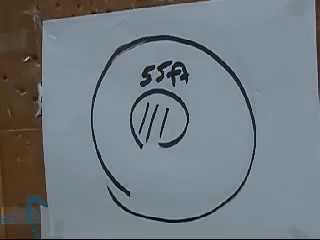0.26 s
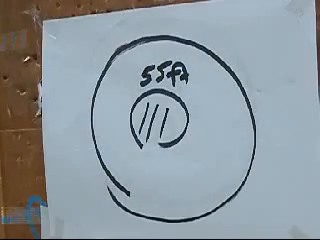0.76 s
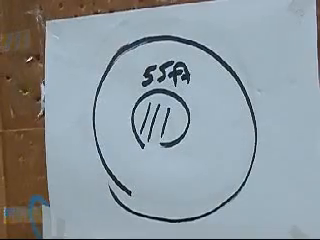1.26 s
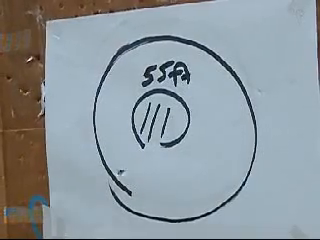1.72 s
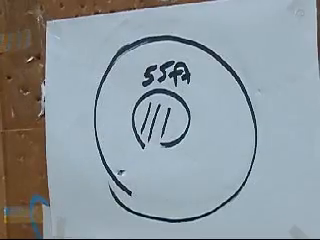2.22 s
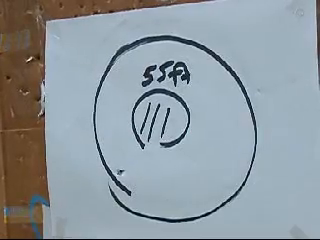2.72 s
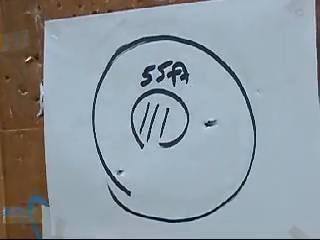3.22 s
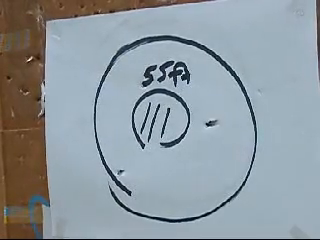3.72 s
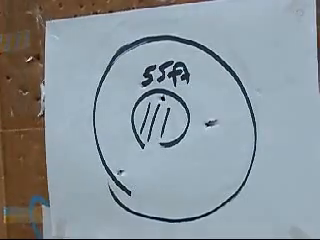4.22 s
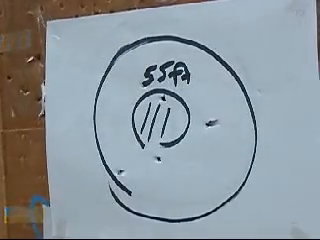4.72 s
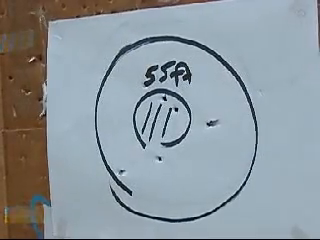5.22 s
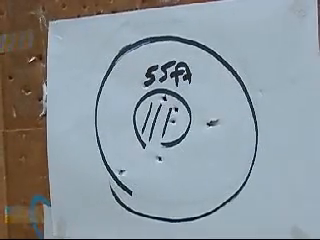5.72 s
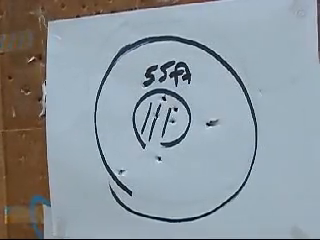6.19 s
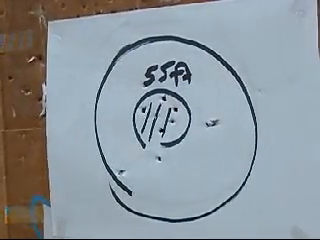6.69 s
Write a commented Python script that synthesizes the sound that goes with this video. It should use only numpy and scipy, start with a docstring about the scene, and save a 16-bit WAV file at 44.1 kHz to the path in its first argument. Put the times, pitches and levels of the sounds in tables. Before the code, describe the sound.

Distant airsoft rifle clacks in single shots, each followed by a sharp paper crack, cardboard thump and rattling pellets, over a swelling hum in an echoing hall.

```python
"""A faint hum and thin electronic tones fade in: coloured noise that slowly swells, and wavering sines.
Far off, an electric airsoft rifle fires single shots: gear whine, then a small double clack made of noise clicks.
About 95 ms after most shots, a BB cracks through a paper target near the microphone.
The cardboard box behind it thumps and crunches, from ringing modes and spiky noise; then BBs rattle inside.
Both places echo in a hall, and the loudest cracks overload the recorder."""
import sys
import numpy as np
from scipy import signal
from scipy.fft import rfft, irfft, next_fast_len
from scipy.io import wavfile
from scipy.ndimage import uniform_filter1d

SR = 44100
rng = np.random.default_rng(int(sys.argv[2]) if len(sys.argv) > 2 else 0)


def master_out(mix):
    """Clip the mix to full scale and print it as 16-bit PCM to the path in sys.argv[1]."""
    frames = np.transpose(np.atleast_2d(mix))
    ceiling = np.clip(frames, -1, 1)
    pcm = np.round(ceiling * 32767).astype(np.int16)
    wavfile.write(sys.argv[1], SR, pcm)


N = 306495  # samples, just under 7 s


def amp(db):
    """Turn decibels into a gain."""
    return 10 ** (np.asarray(db) / 20)


def unit(x):
    """Scale a sound to an rms of 1."""
    return x / np.sqrt(np.mean(x ** 2) + 1e-20)


def along(points, hz):
    """Read a curve of (frequency [Hz], value) points on a log frequency axis."""
    point_hz, values = np.transpose(points)
    return np.interp(np.log(hz + 1), np.log(point_hz + 1), values)


def clock():
    """Time in seconds over the half second that one event may last."""
    return np.arange(SR // 2) / SR


def dying(t, t60):
    """Silent before t = 0, then fading by 60 dB in t60 seconds."""
    return (t >= 0) * np.exp(-np.log(1000) * np.abs(t) / t60)


def noise(spectrum, size):
    """Random hiss of rms 1, coloured by (frequency [Hz], level [dB]) points."""
    hz = np.fft.rfftfreq(size, 1 / SR)
    white = rng.standard_normal(size)
    return unit(irfft(rfft(white) * amp(along(spectrum, hz)), size))


def leveled(x, seconds):
    """Scale a sound to rms 1 over its first seconds."""
    start = x[:max(8, int(seconds * SR))]
    return x / np.sqrt(np.mean(start ** 2) + 1e-20)


def add(track, s, sound):
    """Mix a sound into the track from time s [s]."""
    part = track[max(0, round(s * SR)):][:len(sound)]
    part += sound[:len(part)]


def lowpass(x, hz, order):
    """Cut steeply above hz."""
    size = next_fast_len(N + 8192)
    bins_hz = np.fft.rfftfreq(size, 1 / SR)
    return irfft(rfft(x, size) / np.sqrt(1 + (bins_hz / hz) ** (2 * order)), size)[:N]


def crumple(spectrum, t60, spiky_db):
    """Noise that dies away in uneven little snaps."""
    t = clock()
    wander = unit(uniform_filter1d(rng.standard_normal(len(t)), size=90))
    return amp(spiky_db * wander) * noise(spectrum, len(t)) * dying(t, t60)


# how long the hall rings: (frequency [Hz], time to fall 60 dB [s])
HALL_DECAY = [(100, 0.13), (700, 0.32), (2000, 0.75), (5000, 0.87), (8000, 0.7)]


def room(x, gap, build, echoes):
    """A long hall: a diffuse tail and smeared wall echoes, with fine detail that changes from moment to moment."""
    out, hop = np.zeros(N), SR // 3
    padded = np.pad(x, (hop, 2 * hop))
    for start in range(0, N + hop, hop):
        # shape fresh noise into this moment's answer of the hall
        hz, t, z = signal.stft(rng.standard_normal(SR // 2), SR, nperseg=256)
        rise = 1 - np.exp(-np.maximum(t - gap, 0) / build)
        diffuse = rise * dying(t, along(HALL_DECAY, hz)[:, None])
        slaps = sum(amp(db) * dying(t - s, 0.045) for s, db in echoes)
        # the walls return little bass
        slaps = slaps * amp(along([(300, -18), (1500, 6.5), (7000, -2.5)], hz))[:, None]
        tail = signal.istft(z * np.hypot(diffuse, slaps), SR, nperseg=256)[1]
        # reflections come in clumps
        clumps = unit(uniform_filter1d(rng.standard_normal(len(tail)), size=260))
        tail = tail * amp(4.6 * clumps)
        # overlapping pieces blend one answer into the next
        piece = padded[start:start + 2 * hop] * np.hanning(2 * hop)
        wet = signal.fftconvolve(piece, tail / np.linalg.norm(tail))
        add(out, (start - hop) / SR, wet[max(0, hop - start):])
    return out


# ringing modes of the cardboard box, before each strike varies them:
# (frequency [Hz], level [dB], time to fall 60 dB [s])
BOX_MODES = [(133.4, -21, 0.2), (244.6, -14, 0.14), (317, -3, 0.033), (399.5, -10.5, 0.15),
             (484.4, -1, 0.051), (559.2, -0.5, 0.091), (599.5, -5, 0.063), (715.4, -1.5, 0.05),
             (768, 0, 0.052), (856, -8, 0.094), (987, -4, 0.068), (1195, -19.5, 0.12), (1552, -17, 0.15),
             (1834, -20, 0.16)]


def box(panel_hz, focus_db, reach_db, life):
    """The box rings at new strengths, most of all in the modes near the pitch of the struck panel."""
    t = clock()[:SR // 4]
    hz, db, t60 = np.transpose(BOX_MODES)[:, :, None]
    size, detune, phase = rng.standard_normal((3, len(BOX_MODES), 1))
    # modes far from the panel's pitch are weaker, by reach_db at most
    weight_db = 3 * size - np.minimum(focus_db * np.log2(hz / panel_hz) ** 2, reach_db)
    modes = np.sin(2 * np.pi * hz * (1 + .03 * detune) * t + 2 * phase)
    ring = np.sum(amp(db + weight_db) * dying(t, t60 * life) * modes, axis=0)
    return ring * (1 - np.exp(-t / 0.00099))  # soft start


# colour of the hum and hiss: (frequency [Hz], relative level [dB])
HUM_COLOUR = [(20, 0.5), (120, -0.5), (200, -11), (290, -10.5), (380, -11), (800, -9), (1300, -19.5),
              (1900, -18.5), (2300, -26.5), (6900, -26.5), (7300, -14), (7600, -31)]
# thin steady tones: (frequency [Hz], rms level [dB])
WHINE_TONES = [(1950, -60.5), (7012, -49), (7290, -53), (7356, -58.5)]
# the hum's starting level, and its slow swell
BACKGROUND_DB, SWELL_DB_PER_S = -40, 0.636


def background():
    """Low room hum and hiss, with a few thin electronic tones that waver slightly."""
    t = np.arange(N) / SR
    whine = np.zeros(N)
    for hz, db in WHINE_TONES:
        drift = .004 * np.cumsum(rng.standard_normal(N))  # phase wanders at random
        whine += amp(db) * np.sqrt(2) * np.sin(2 * np.pi * hz * t + drift)
    hum = noise(HUM_COLOUR, next_fast_len(N))[:N]
    return amp(BACKGROUND_DB + SWELL_DB_PER_S * t) * hum + whine


# the piston slams home: (time [s], level [dB])
SHOTS = [(0.457, -12), (1.099, -16.5), (1.7202, -15.5), (2.8379, -16.5), (3.4295, -17), (3.9798, -16.5),
         (4.5198, -17.5), (5.109, -17), (5.692, -18.5), (6.0179, -18.5), (6.3307, -20), (6.611, -21),
         (6.9165, -19.5)]
# the clicks within one shot: (delay [s], level against the shot [dB])
SHOT_CLICKS = [(-.003, -7.5), (0, 4.5), (.0032, 9), (.0085, -4)]
# colour of the clicks and the rattle: (frequency [Hz], relative level [dB])
CLACK_COLOUR = [(60, -21), (200, -25), (700, 2.5), (1200, -3), (1850, -1), (2400, -8), (4000, 2), (5600, 3),
                (7500, -2.5)]


def rifle():
    """The gears whine as they cock the spring; then piston and gearbox clack 3 ms apart over a short puff of air."""
    out, t = np.zeros(N), clock()
    lead = .07  # s of gear whine before the shot
    u = t - lead  # time from the shot
    for s, db in SHOTS:
        for delay, click_db in SHOT_CLICKS:
            click = leveled(noise(CLACK_COLOUR, len(t)) * dying(t, 0.0038), 0.0009)
            add(out, s + delay, amp(db + click_db) * click)
        # the rattle grows towards the shot and dies more slowly after it
        swell = np.where(u < 0, dying(-u, .035), dying(u, .09))
        rattle = .42 * swell * noise(CLACK_COLOUR, len(t))
        air = noise([(60, -6.5), (200, -9.5), (750, -4.0), (1400, -12), (4000, -34.5)], len(t))
        puff = amp(-7.0) * dying(u + 0.0015, 0.095) * air
        winding = np.sin(np.pi * np.minimum(t / lead, 1))
        gears = noise([(1200, -28.5), (1550, -3.5), (1900, -26), (5000, -11.5), (5450, -9), (5900, -20.5)], len(t))
        add(out, s - lead, amp(db) * (rattle + puff + amp(-26) * winding * gears))
    return out


# a BB hits the target; also played by thumps() and cracks():
# (time [s], box thump level [dB], crunch level of torn board [dB], panel pitch [Hz])
HITS = [(1.187, -13, -20.5, 690), (1.81, -14.5, -19, 575), (2.9318, -15, -20, 670), (3.525, -22, -22, 616),
        (4.0695, -15, -22.5, 540), (4.6134, -16.5, -23, 613), (5.2044, -14.5, -24.5, 680),
        (5.7869, -12, -22, 820), (6.1133, -14, -22.5, 550), (6.4197, -16, -26, 610),
        (6.7068, -13, -34, 556)]
# colour of a small tick, also played by bounces(): (frequency [Hz], relative level [dB])
TICK_COLOUR = [(200, -27.5), (800, 7), (1800, -2.5), (3000, 1), (5000, -2.5), (7500, -8.5)]


def skitter():
    """Each hit stirs loose BBs and flakes of board into a few faint ticks."""
    out, t = np.zeros(N), clock()[:SR // 4]
    for s, *_ in HITS:
        for when, size in rng.random(size=(6, 2)):
            delay = 0.027 + .3 * when
            tick = leveled(noise(TICK_COLOUR, len(t)) * dying(t, 0.037), 0.023)
            knock = leveled(box(780, focus_db=9, reach_db=14.0, life=1.0), 0.011)
            level_db = -27.5 - 11.3 * size - 36.3 * delay  # later ticks tend to be softer
            add(out, s + delay, amp(level_db) * (tick + 0.69 * knock))
    return out


# spent BBs bounce inside the box: (time [s], knock level [dB], tick level [dB])
BOUNCES = [(1.259, -15.5, -46), (1.2893, -29, -34), (1.3264, -21, -34), (1.4415, -25, -43),
           (1.4554, -31.5, -33), (1.5981, -26.5, -35.5), (1.8475, -14.5, -26), (1.9073, -18.5, -24.5),
           (2.0155, -23.5, -36), (2.0488, -23, -31.5), (2.084, -27.5, -38.5), (2.2043, -30, -36),
           (2.2882, -33, -39.5), (3.0371, -32, -29), (3.1715, -42, -34), (3.5795, -23, -22),
           (3.6254, -12.5, -20.5), (3.879, -39, -31), (4.114, -16, -21), (4.2902, -27, -54),
           (4.381, -21.5, -51), (4.4735, -18, -28), (4.5086, -21, -32), (4.6731, -23, -38),
           (4.6885, -31, -26), (4.8175, -24, -34), (5.2359, -15, -28), (5.274, -20.5, -27),
           (5.3239, -23.5, -35), (5.3318, -21, -38), (5.3789, -23.5, -28), (5.4268, -46, -25),
           (5.8785, -17.5, -19), (5.8887, -22.5, -30), (6.2095, -30, -22.5), (6.294, -12.5, -25.5),
           (6.7688, -19.5, -25.5)]
# colour of the fluttering panel: (frequency [Hz], relative level [dB])
FLUTTER_COLOUR = [(100, -15.5), (400, -6.5), (700, 7), (1000, 1.5), (1700, 1.5), (2500, -22), (7000, -38)]
# the walls they strike: pitch under a medium knock, its fall with a harder one, and its scatter from spot to spot
WALL_HZ, MEDIUM_KNOCK_DB, WALL_SAG_HZ_PER_DB, WALL_SCATTER_HZ = 743, -24, 3, 25
# the wall's quick overtone: pitch over the panel's, level against the knock, and time to fall 60 dB
SLAP_RATIO, SLAP_DB, SLAP_T60_S = 1.925, -5, 0.0098


def bounces():
    """A spent BB ticks on a wall of the box; the panel dents with a slap, springs back and flutters briefly."""
    out, t = np.zeros(N), clock()[:SR // 4]
    for (s, knock_db, tick_db), spot in zip(BOUNCES, rng.standard_normal(len(BOUNCES))):
        sag_hz = WALL_SAG_HZ_PER_DB * (knock_db - MEDIUM_KNOCK_DB)
        panel_hz = WALL_HZ - sag_hz + WALL_SCATTER_HZ * spot
        dent = np.sin(2 * np.pi * panel_hz * t) * dying(t, .028)
        # a hard knock shakes the whole box, a soft one only its own panel
        ring = box(panel_hz, focus_db=32.5, reach_db=max(0, -.8 * (knock_db + 10.5)), life=1.0)
        knock = leveled(0.76 * leveled(dent, 0.011) + leveled(ring, 0.017), 0.0098)
        add(out, s, amp(knock_db) * knock)
        slap = np.sin(2 * np.pi * SLAP_RATIO * panel_hz * t) * dying(t, SLAP_T60_S)
        add(out, s, amp(knock_db + SLAP_DB) * leveled(slap, 0.0012))
        flutter = leveled(crumple(FLUTTER_COLOUR, t60=0.094, spiky_db=3.5), 0.018)
        add(out, s, amp((knock_db + tick_db) / 2 - 4) * flutter)
        tick = noise(TICK_COLOUR, len(t)) * (dying(t, 0.01) + 0.36 * dying(t, 0.09))
        add(out, s, amp(tick_db + 4.5) * leveled(tick, 0.0034))
    return out


# colour of the tearing board: (frequency [Hz], relative level [dB])
CRUNCH_COLOUR = [(40, -10.5), (120, -5), (280, 2), (600, 7.5), (950, 5.5), (1300, 2.5), (2200, -4),
                 (2900, -1.5), (4500, -5.5), (7500, -9.5)]
# the more the board tears, the more the box rocks: level against the crunch, and delay
ROCK_DB, ROCK_DELAY_S = 0.5, .014


def thumps():
    """Behind the paper the box thumps while the torn board crunches."""
    out = np.zeros(N)
    for s, thump_db, crunch_db, panel_hz in HITS:
        thump = leveled(box(panel_hz, focus_db=10, reach_db=3.5, life=1.45), .02)
        add(out, s + .0004, amp(thump_db) * thump)
        # the whole box rocks back a moment later, at a lower pitch
        rock = leveled(box(180, focus_db=5.5, reach_db=17, life=0.75), 0.023)
        add(out, s + ROCK_DELAY_S, amp(crunch_db + ROCK_DB) * rock)
        crunch = leveled(crumple(CRUNCH_COLOUR, t60=0.24, spiky_db=3.5), 0.1)
        add(out, s, amp(crunch_db) * crunch)
    return out


# ringing of the cracked paper, before each hit shifts the pitches:
# (frequency [Hz], relative level [dB], time to fall 60 dB [s])
PAPER_MODES = [(926, -12, 0.018), (1796, -4, 0.0038), (2682, -2.5, 0.0082), (3040, -7, 0.0089),
               (3923, -8.5, 0.0074), (5110, -12.5, 0.011), (7160, -6, 0.0056)]
# level of the paper's crack, alike for all hits [dB]
CRACK_DB = -4.5


def cracks():
    """The BB snaps the paper: short ringing modes and a burst of noise."""
    out, t = np.zeros(N), clock()
    for s, *_ in HITS:
        snap = np.zeros(len(t))
        shifts = 1 + .04 * rng.standard_normal(len(PAPER_MODES))
        for (hz, db, t60), shift in zip(PAPER_MODES, shifts):
            snap += amp(db) * dying(t, t60) * np.cos(2 * np.pi * hz * shift * t)
        burst = 0.91 * dying(t, 0.0059) * rng.standard_normal(len(t))
        snap = (snap + burst) * (1 - np.exp(-t / 0.00059))  # soft start
        add(out, s - .0002, amp(CRACK_DB) * leveled(snap, 0.00077))
        # a faint hiss before the snap
        hiss = dying(t, 0.1) * noise([(500, -10.5), (1500, -2), (2800, -8.0), (7000, -5)], len(t))
        add(out, s - len(t) / SR, amp(-26) * hiss[::-1])
    return out


# wall echoes of the rifle: (delay [s], level against the start of the hall's tail, before wall colour [dB])
RIFLE_ECHOES = [(.074, 8.5)]
# wall echoes of the target: (delay [s], level against the start of the hall's tail, before wall colour [dB])
TARGET_ECHOES = [(.018, -14.5), (.053, 1), (.176, -2)]


def scene():
    """The far rifle is heard with much of the hall, the near box with little, the paper almost dry."""
    gun, paper, board = rifle(), cracks(), thumps() + bounces() + skitter()
    far = gun + amp(-5) * room(gun, gap=0.0011, build=0.00074, echoes=RIFLE_ECHOES)
    spill = board + .35 * paper  # what reaches the hall from the target
    near = paper + board + amp(-10.5) * room(spill, gap=0.0062, build=0.013, echoes=TARGET_ECHOES)
    return (far + near + background())[None]


# top of the recorder's band, and of what leaves it after clipping
BAND_HZ, TOP_HZ = 7820, 16500
# the opening fade: starting gain and length
FADE_FROM_DB, FADE_S = -23, 1.77


def record(dry):
    """The loudest cracks clip a narrow-band recorder and splash above its band; the sound fades in."""
    narrow = lowpass(dry[0], BAND_HZ, order=48)
    clipped = narrow / (1 + np.abs(narrow / 1.06) ** 16) ** (1 / 16)  # peaks flatten towards 1.06
    fade = np.interp(np.arange(N) / SR, [0, FADE_S], [amp(FADE_FROM_DB), 1])
    return lowpass(clipped * fade, TOP_HZ, order=60)[None]


dry = scene()
out = record(dry)
master_out(out)
```